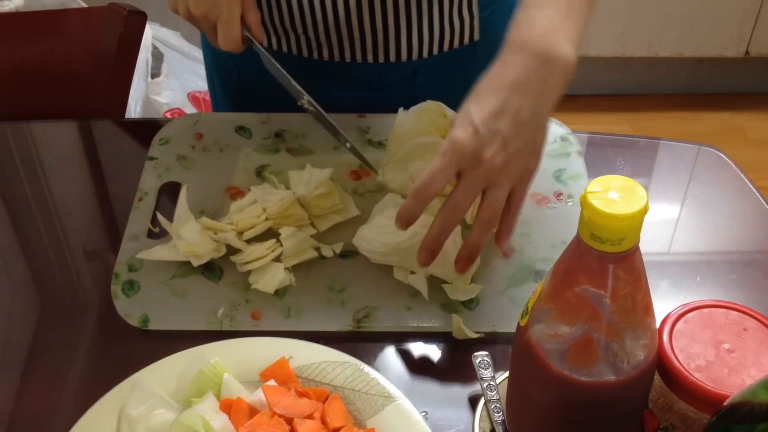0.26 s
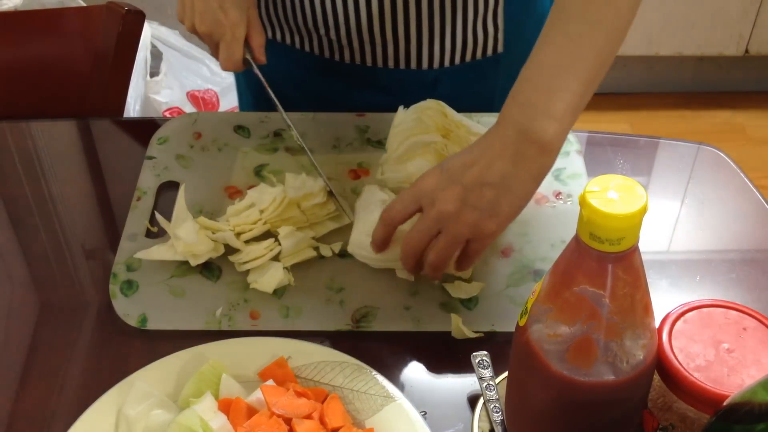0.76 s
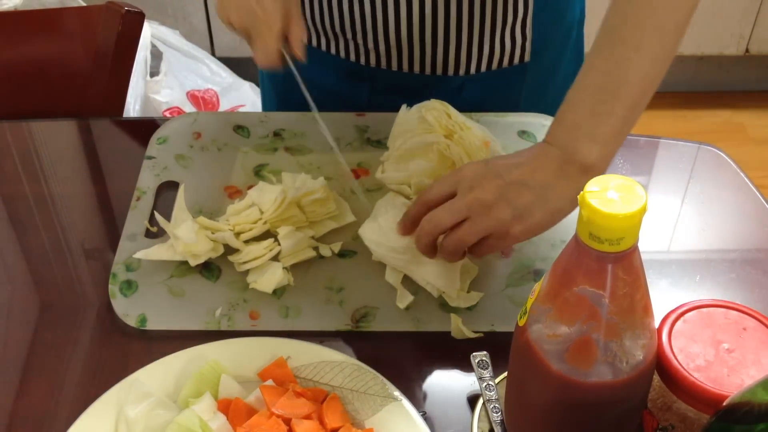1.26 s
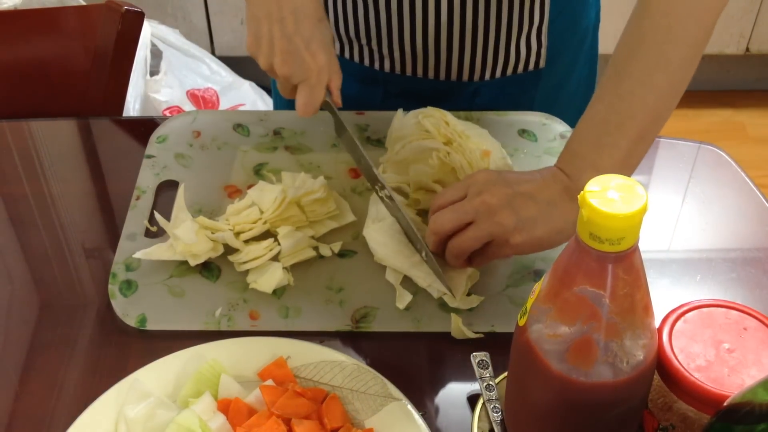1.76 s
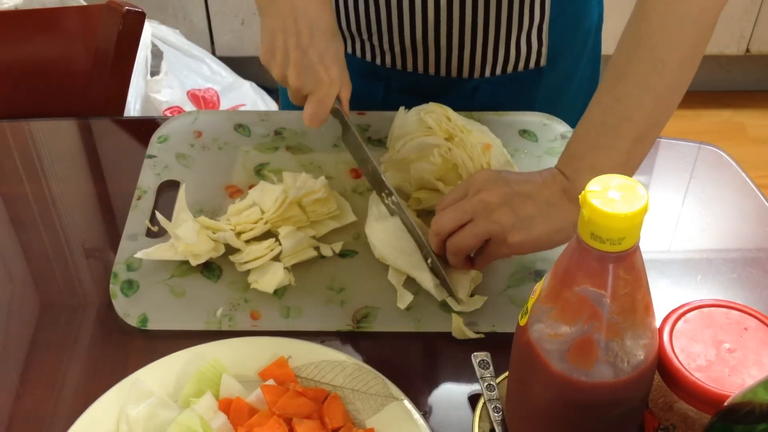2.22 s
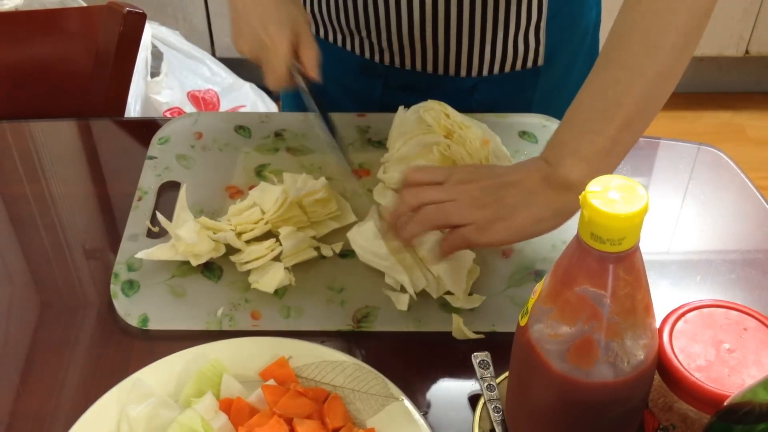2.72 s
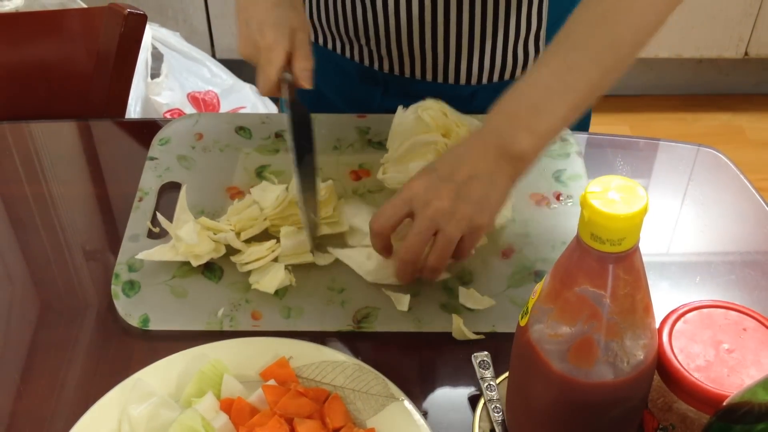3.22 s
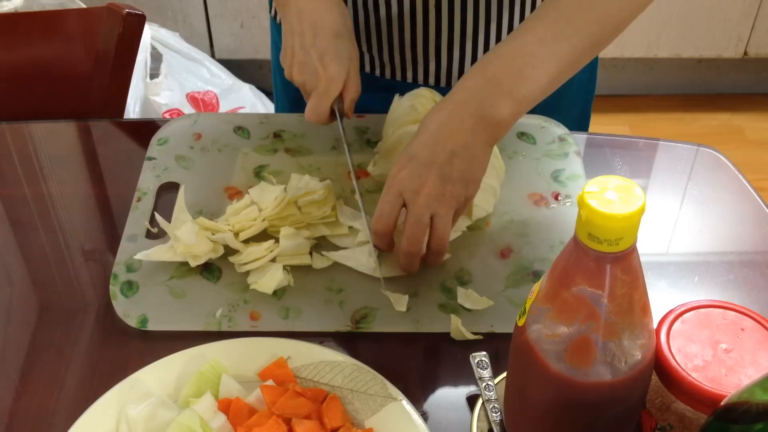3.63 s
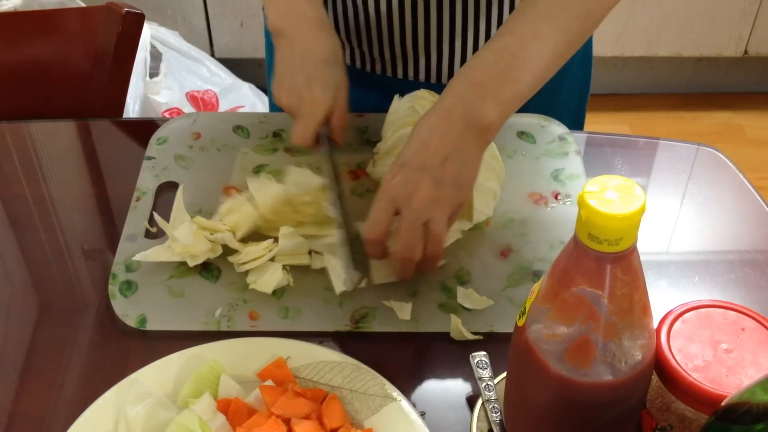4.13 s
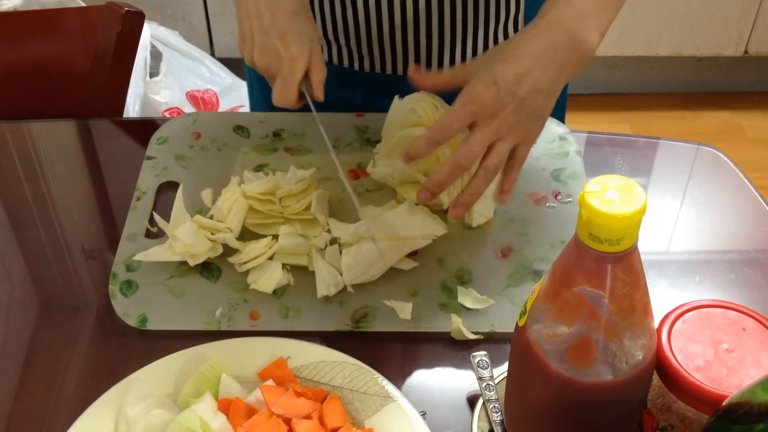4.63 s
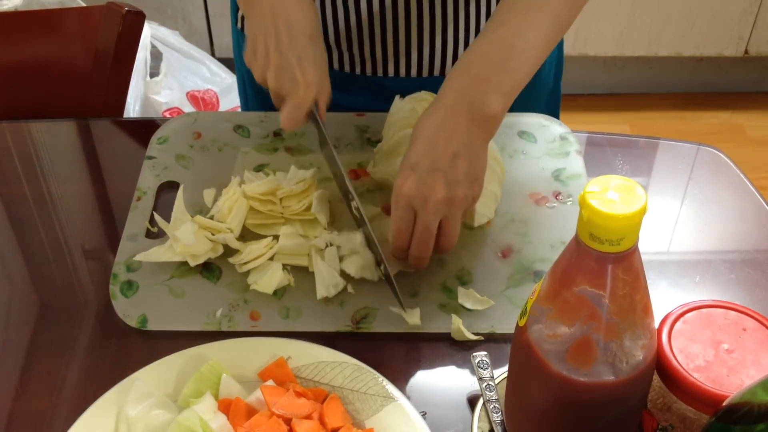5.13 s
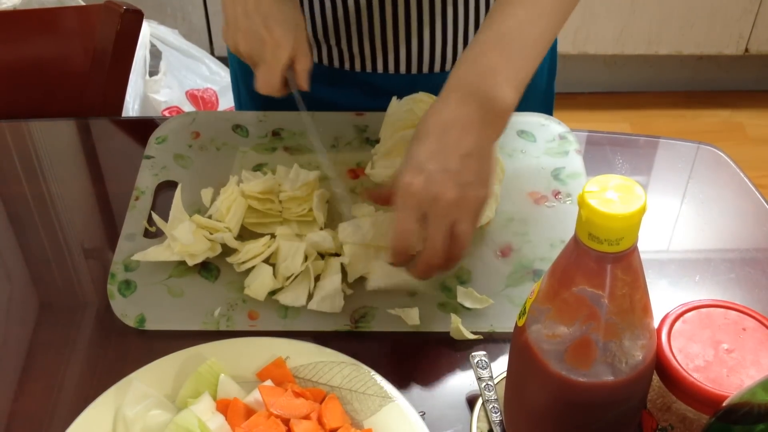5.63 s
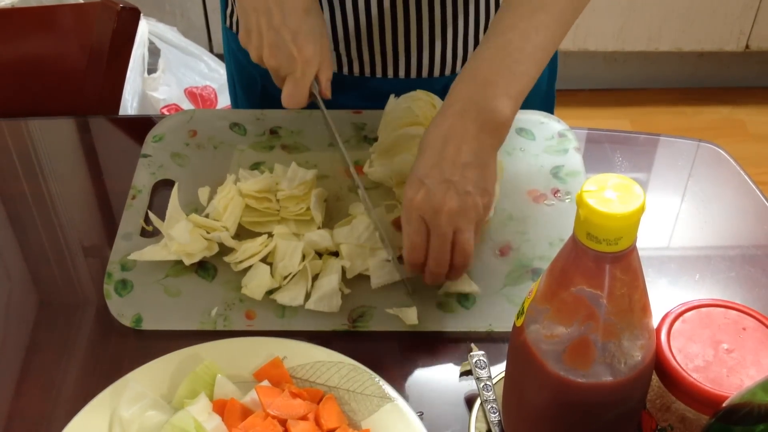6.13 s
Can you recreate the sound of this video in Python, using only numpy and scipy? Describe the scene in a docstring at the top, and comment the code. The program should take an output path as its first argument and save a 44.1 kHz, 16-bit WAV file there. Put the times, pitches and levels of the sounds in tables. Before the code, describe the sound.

A quiet kitchen with a soft, steady hum and slight short echo, heard close by a small microphone lacking deep bass. A faint leaf rustle fades at the start; from 0.5 to 1.4 seconds small crisp tears and snaps come scattered. At about 1.5 a long cut begins, crunching densely through raw cabbage, with many bright cracks around 1.7 to 2.1 and another crackling run from 2.3 to 2.55, ending in light hollow board knocks. It drops to rustles and small tears, with a light tap near 3.0. A short crisp cut at 3.7 to 4.0 lands two sharp knocks; a very faint steel tick follows at 4.2. After a lull, snaps resume at 4.9, with a crunch from 5.05 to 5.3. A small thin blade ring sounds near 5.45, then only soft leaf shuffling until the end at about 6.4.

```python
"""A kitchen knife slices raw cabbage on a thin cutting board lying on a table.
Tearing leaves are crackling noise that swells and fades; snapping ribs and veins are short cracks with a pitch.
The board rings when knocked and grates when rubbed; the steel blade rings when its edge touches down.
A quiet kitchen hums behind, as shaped noise, and answers with a short echo."""
import sys
import numpy as np
from scipy import signal
from scipy.fft import rfft, irfft, next_fast_len
from scipy.io import wavfile
from scipy.ndimage import uniform_filter1d

SR = 44100
rng = np.random.default_rng(int(sys.argv[2]) if len(sys.argv) > 2 else 0)


def persist_wave(psi):
    """Save psi, clipped to +-1, as 16-bit WAV."""
    counts = np.round(np.clip(psi, -1, 1) * 32767).astype(np.int16)
    wavfile.write(sys.argv[1], SR, np.atleast_2d(counts).T)


N = 280917  # length in samples

# ways the cutting board vibrates (its modes): pitch_hz, width_hz, level_db (relative)
BOARD_MODES = [(270, 110, -4), (510, 150, -3), (750, 200, -3), (980, 200, -4), (1170, 320, -2)]
# the blade or a rib strikes the board: start_s, level_db (before the bass cut), near_hz (mode nearest the blow)
BOARD_KNOCKS = [(0.034, -35, 600), (1.8305, -27, 1180), (1.9036, -32, 1170), (2.3387, -23, 1120),
                (2.5318, -20, 1180), (2.6768, -34, 760), (3.0263, -26, 1230), (3.7954, -18.5, 780),
                (3.9583, -21.5, 510), (5.0934, -32, 1240)]


def amp(db):
    """Turn decibels into a plain gain."""
    return 10 ** (np.asarray(db) / 20)


def unit(x):
    """Scale a signal to an average (RMS) level of 1."""
    return x / np.sqrt(np.mean(x ** 2) + 1e-20)


def along(points, hz):
    """Read a curve of (Hz, value) points, with straight lines on a log pitch axis."""
    f, v = np.transpose(points)
    return np.interp(np.log(hz + 1), np.log(f + 1), v)


def filtered(x, response):
    """Multiply the spectrum of x by a (possibly complex) response of frequency."""
    m = next_fast_len(N + SR // 2)  # spare room for ringing
    spectrum = rfft(x, m) * response(np.fft.rfftfreq(m, 1 / SR))
    return irfft(spectrum, m)[..., :N]


def modes(table):
    """Response of resonances (Hz, width Hz, dB) that ring only after they are driven."""
    def response(f):
        total = 0
        for k, (center, width, db) in enumerate(table):
            resonance = 1j * f * width / (center * center - f * f + 1j * f * width)
            total = total + (-1) ** k * amp(db) * resonance  # signs alternate
        return total
    return response


def swell(s, db, rise_ms, fall_ms):
    """Power that climbs to a peak and falls, evenly in dB (ms per 10 dB); gives the samples touched and power."""
    rise, fall = max(rise_ms, 2) / 1000, max(fall_ms, 4) / 1000
    first = max(round((s - 5 * rise) * SR), 0)  # the shape spans 50 dB on each side
    last = min(round((s + 5 * fall) * SR), N)
    span = slice(first, last)
    t = np.arange(first, last) / SR - s
    drop_db = 10 * np.where(t < 0, -t / rise, t / fall)
    return span, amp(db - drop_db) ** 2


def nearness(near_hz):
    """Gain of each board mode for a touch at a place: 14 dB weaker per octave away."""
    octaves = np.abs(np.log2(np.array(BOARD_MODES)[:, 0] / near_hz))
    return amp(-14 * octaves)


def hum():
    """The steady noise of the kitchen, with a few wavering tones made of narrow noise bands."""
    # colour of the hum: pitch_hz, level_db (relative, per Hz)
    hum_colour = [(25, -6), (110, -19), (155, -3.5), (350, -3.5), (520, -6.5), (850, -4), (1250, -8.5),
                  (1700, -15), (3800, -21), (6300, -18), (11600, -25.5), (15500, -22.5)]
    # fuzzy tones: pitch_hz, width_hz, level_db
    drones = [(251.5, 8.5, -69.5), (347.6, 24, -67.5), (811, 6.3, -69)]
    noise = filtered(rng.standard_normal(N), lambda hz: amp(along(hum_colour, hz)))
    sound = amp(-57) * unit(noise)
    for hz, width, db in drones:
        tone = filtered(rng.standard_normal(N), modes([(hz, width, 0)]))
        sound = sound + amp(db) * unit(tone)
    return sound


def kitchen(x):
    """The room's echo is a fading noise tail in which each frequency dies at its own speed."""
    # how long the echo takes to fade by 60 dB: pitch_hz, fade_s
    echo_fades = [(200, 0.32), (2000, 0.3), (10000, 0.2)]
    hz, t, z = signal.stft(rng.standard_normal(SR // 2), SR, nperseg=256)
    fade = amp(-60 * t / along(echo_fades, hz)[:, None])
    tail = signal.istft(z * fade, SR, nperseg=256)[1]
    late = np.pad(x, (200, 0))  # the echo starts 200 samples late
    return signal.fftconvolve(late, tail / np.linalg.norm(tail))[:N]


def blade():
    """The edge scrapes for a few milliseconds and sets the steel ringing; the place chooses the modes."""
    # the edge touches the board: start_s, level_db (relative), place (0 near the tip, 1 near the heel)
    touches = [(4.2, -29, 0), (5.454, -24.5, 0.98)]
    # ringing tones of the steel: pitch_hz, tip_db, heel_db (relative, struck there), fade_s (to fall 60 dB)
    blade_modes = [(3365, -13, -1.5, 0.092), (3940, -15, -8, 0.11), (4766, -24, 1.5, 0.065),
                   (4900, 1, -24, 0.1), (6100, -3, -13, 0.053), (6650, -20, -5, 0.078),
                   (7180, -2, -2, 0.079), (7650, -6, -2, .05), (8460, -19, 4, 0.06), (9800, -6, -10, 0.046),
                   (11200, -14, -13, 0.062)]
    steel, t = np.zeros(N + SR), np.arange(SR // 4) / SR
    onset = 1 - np.exp(-(t / 0.0046) ** 2)
    for s, db, place in touches:
        ring = np.zeros(len(t))
        for hz, tip_db, heel_db, fade_s in blade_modes:
            level_db = tip_db + place * (heel_db - tip_db) + rng.normal(0, 1.5)
            ring += amp(level_db - 60 * t / fade_s) * np.sin(2 * np.pi * (hz * t + rng.random()))
        start = round((s - 0.006) * SR)  # the soft onset begins a little early
        steel[start:][:len(t)] += amp(db - 3) * ring * onset
    return steel[:N]


def knocks():
    """A blow of about a millisecond rings every board mode, most the nearest; the thin board sends out little bass."""
    wood, t = np.zeros(N + SR), np.arange(SR // 10) / SR
    onset = 1 - np.exp(-t / 0.00067)
    for s, db, near_hz in BOARD_KNOCKS:
        ring = np.zeros(len(t))
        for gain, (hz, width, level_db) in zip(nearness(near_hz), BOARD_MODES):
            fade = np.exp(-np.pi * width * t)  # a wide mode dies fast
            ring += gain * amp(level_db) * fade * np.sin(2 * np.pi * hz * t)
        ring = ring * onset
        wood[round(s * SR):][:len(t)] += amp(db) * ring / np.abs(ring).max()
    bass_cut = signal.butter(2, 297, "highpass", fs=SR, output="sos")
    return signal.sosfilt(bass_cut, wood[:N])


def tearing():
    """Power of all tearing and rubbing leaves, as a sum of swells."""
    # a leaf rips open at once and the tear runs out: peak_s, level_db, fall_ms (per 10 dB)
    rips = [(0.005, -42.5, 73), (0.595, -47, 67.5), (0.794, -35, 27), (0.894, -35, 27), (1.124, -40.5, 36),
            (1.185, -48.5, 64), (1.241, -33.5, 30), (1.271, -37, 29.5), (1.395, -52.5, 139),
            (1.55, -31, 80.5), (1.667, -26.5, 25.5), (1.701, -30, 24), (1.73, -28.5, 16.5),
            (1.767, -30.5, 39), (1.836, -23.5, 47), (1.906, -34, 9), (1.953, -36, 18.5), (2.004, -29, 17.5),
            (2.133, -30, 17.5), (2.187, -30.5, 41), (2.228, -29, 6), (2.298, -38, 50.5), (2.342, -31, 27),
            (2.418, -32, 110), (2.675, -40, 47), (2.873, -46.5, 36.5), (3.005, -37.5, 6),
            (3.095, -45, 30.5), (3.316, -35.5, 12.5), (3.354, -40, 125.5), (3.746, -41, 47.5),
            (3.8, -35.5, 51), (4.069, -39.5, 9.5), (4.199, -40, 63.5), (4.906, -38, 18.5),
            (4.95, -47.5, 70.5), (5.096, -36, 17.5), (5.985, -46.5, 15.5), (6.36, -43, 45)]
    # the blade presses ever harder until the stack gives way: peak_s, level_db, rise_ms (per 10 dB)
    cuts = [(0.947, -35.5, 37), (2.067, -27.5, 56.5), (2.524, -29.5, 36.5), (3.057, -37.5, 27),
            (3.192, -49.5, 200.5), (3.291, -42, 101.5), (3.846, -36, 16.5), (3.95, -27.5, 21),
            (4.134, -50.5, 48), (5.188, -28, 50.5), (5.294, -32, 59.5)]
    # a hand shifts leaves, swelling and fading alike: peak_s, level_db, slope_ms (per 10 dB)
    rubs = [(0.535, -48, 20), (1.026, -40.5, 58.5), (2.779, -40.5, 23.5), (3.44, -43.5, 59),
            (3.578, -40.5, 19.5), (3.677, -40.5, 15), (3.716, -41.5, 10), (4.011, -38.5, 40.5),
            (4.309, -40, 49), (4.859, -39.5, 24), (5.369, -44, 35.5), (5.461, -37.5, 53.5),
            (5.56, -42.5, 55), (5.906, -42, 18.5), (6.06, -52, 79.5), (6.242, -43, 39)]
    rip_rise_ms, cut_fall_ms = 7, 22  # per 10 dB
    shapes = [(s, db, rip_rise_ms, ms) for s, db, ms in rips]
    shapes += [(s, db, ms, cut_fall_ms) for s, db, ms in cuts]
    shapes += [(s, db, ms, ms) for s, db, ms in rubs]
    power = np.zeros(N)
    for shape in shapes:
        span, tear = swell(*shape)
        power[span] += tear
    return power


def veins():
    """Thin veins snap by chance, more often and louder the harder the leaves tear; rows like the ribs'."""
    count = 60
    over_tearing_db, scatter_db = 5.5, 3.5
    middle_hz, spread_octaves = 5300, 0.394
    power, draw = tearing(), rng.random(count)
    spread = rng.standard_normal((count, 2))
    chance = np.cumsum(np.sqrt(power))
    at = np.searchsorted(chance, draw * chance[-1])
    db = 10 * np.log10(power[at]) + over_tearing_db + scatter_db * spread[:, 0]
    hz = middle_hz * 2 ** (spread_octaves * np.clip(spread[:, 1], -2, 2))
    return list(zip(at / SR, db, hz))


def snaps():
    """Each rib or vein cracks for milliseconds: its air pocket rings at two pitches, fibres tear after it."""
    # ribs that snap loudly: start_s, level_db (relative), pitch_hz
    ribs = [(0.5446, -33.5, 3800), (0.599, -27, 4070), (0.69, -43, 3300), (0.787, -27, 3600),
            (0.8632, -22, 5200), (0.8918, -28, 5100), (1.186, -33, 3480), (1.2375, -23.5, 3100),
            (1.276, -28, 4500),(1.3956, -35, 3000), (1.5096, -43, 3570), (1.5462, -23, 3100),
            (1.562, -21.5, 2980), (1.603, -23, 3040), (1.6639, -19.5, 6660), (1.6998, -17, 2800),
            (1.7272, -17.5, 7480), (1.7593, -25, 4030), (1.77, -17.5, 3060), (1.8252, -17, 3820),
            (1.8296, -15, 6370), (1.8483, -14, 2800), (1.8559, -16.5, 2300), (1.8691, -17, 2500),
            (1.876, -16.5, 5330), (1.9033, -15.5, 3840), (1.951, -22, 7000), (2.0004, -16.5, 5000),
            (2.024, -15.5, 5840), (2.044, -14, 6750), (2.052, -21, 3800), (2.1053, -18.5, 3870),
            (2.1297, -35, 7700), (2.228, -18, 5860), (2.295, -25.5, 5330), (2.3392, -13, 2990),
            (2.414, -20.5, 5940), (2.4334, -23, 5860), (2.4491, -20, 5600), (2.4652, -18.5, 5750),
            (2.4805, -14.5, 4500), (2.4948, -16, 3300), (2.5213, -16, 6720), (2.5312, -17.5, 2880),
            (3.0266, -28.5, 3580), (3.225, -29.5, 5900), (3.718, -30.5, 4870), (3.741, -25.5, 7530),
            (3.795, -16.5, 6670), (3.805, -24, 5460), (3.8272, -22, 5960), (3.846, -25.5, 9240),
            (3.9216, -17, 7650), (3.9278, -17, 5680), (3.9488, -22, 6000), (3.958, -15, 2320),
            (4.0107, -23, 5800), (4.1342, -31.5, 2960), (4.9024, -22, 6400), (4.9532, -25.5, 7390),
            (5.0365, -30, 3370), (5.0936, -14, 3620), (5.1268, -25, 3540), (5.1483, -20.5, 3500),
            (5.1688, -24, 3900), (5.177, -20, 7650), (5.184, -15.5, 3700), (5.1952, -14.5, 7400),
            (5.2925, -16.5, 7580), (5.2966, -20, 3900), (5.381, -34.5, 4830), (5.3938, -40, 4800),
            (5.405, -36, 4760), (5.5722, -38, 4800), (6.243, -33, 2970), (6.2562, -34, 3330)]
    cracks, t = np.zeros(N + SR), np.arange(SR // 20) / SR
    band = signal.butter(2, [1800, 11000], "bandpass", fs=SR)
    envelope = amp(-60 * t / 0.0086) * (1 - np.exp(-t / 0.0001))
    for s, db, hz in ribs + veins():
        noise = unit(signal.lfilter(*band, rng.standard_normal(len(t))))
        partner_hz = hz * 3.2 * rng.normal(1, 0.04)  # folds back down if above SR / 2
        pocket = np.sin(2 * np.pi * hz * t) + 0.5 * np.sin(2 * np.pi * partner_hz * t)
        crack = (pocket + 0.55 * noise) * envelope
        fibres = amp(-37.5 - 60 * t / 0.12) * noise
        crack = crack / np.abs(crack).max() + fibres
        cracks[round(s * SR):][:len(t)] += amp(db + 2.5) * crack
    return cracks[:N]


def crackle(density, spread_db, life, bed_db):
    """Breaking cells: noise bursts (density per s, life s to fade 60 dB) of random size, over a rubbing bed."""
    size_db = np.minimum(spread_db * rng.exponential(size=N), 12)
    breaks = (rng.random(N) < density / SR) * amp(size_db)
    fade = amp(-60 * np.arange(SR // 20) / SR / life)
    bursts = unit(signal.fftconvolve(breaks, fade)[:N])
    return (bursts + amp(bed_db)) * rng.standard_normal(N)


def patchy(x, depth_db):
    """Folds of leaf open and close pockets of air: random colour in patches of some hundred Hz by some ten ms."""
    z = signal.stft(x, nperseg=256)[2]
    field = uniform_filter1d(rng.standard_normal(z.shape), size=4, axis=0)  # smooth over pitch
    field = uniform_filter1d(field, size=12, axis=1)  # smooth over time
    return signal.istft(z * amp(depth_db * unit(field)), nperseg=256)[1][:N]


def leaves():
    """Each tear swells and fades; thin leaves hiss bright, thick ones crunch low; the board takes the drag."""
    # colour of the leaves: pitch_hz, level_db (relative, per Hz)
    leaf_colour = [(880, -15), (1500, -14), (1750, -10.5), (2150, -3), (2340, -2), (3770, -2), (6790, -0.5),
                   (12900, -12.5), (14500, -31)]
    # share of treble in the tearing, low where leaves are thick: time_s, share_db (before the limits below)
    brightness = [(0, 2), (.3, 4), (.55, -3), (1, -2), (1.2, -6), (1.5, -0.5), (1.7, -5.5), (2.1, -3.5),
                  (2.6, -3), (3.2, -0.5), (3.45, -3.5), (3.6, -1.37), (5.3, -1), (5.45, -2.5), (6.37, -3)]
    # leaves drag and press on the board: peak_s, level_db (relative), near_hz (mode nearest the place)
    drags = [(2.05, -48, 1000), (2.36, -39, 270), (2.44, -40, 270), (2.51, -41, 990), (3.975, -43, 520),
             (4.119, -49, 750), (4.198, -47, 830), (5.16, -41, 448), (5.28, -42, 1070), (5.45, -44, 810)]
    drag_rise_ms, drag_fall_ms = 17, 32  # per 10 dB
    rattle_db, rattle_fall_ms = -19.5, 37  # relative to the knock; per 10 dB
    cut_hz = 1480  # board pitch for the place where the leaves are cut

    power = tearing()
    share_db = np.interp(np.arange(N) / SR, *np.transpose(brightness))
    treble = power * np.clip(amp(share_db) ** 2, 0.05, 0.95)

    rubs = [(s, db, drag_rise_ms, drag_fall_ms, hz) for s, db, hz in drags]
    # after a knock the board rattles on the table
    rubs += [(s, db + rattle_db, 0, rattle_fall_ms, hz) for s, db, hz in BOARD_KNOCKS]
    drag = np.zeros((len(BOARD_MODES), N))  # power in each board mode
    for s, db, rise_ms, fall_ms, near_hz in rubs:
        span, rub = swell(s, db, rise_ms, fall_ms)
        drag[:, span] += rub * nearness(near_hz)[:, None] ** 2

    cells = crackle(density=300, spread_db=1.5, life=0.013, bed_db=-1.0)
    grit = crackle(density=260, spread_db=-1.0, life=0.015, bed_db=2.5)

    # the sound through the air, split near 5 kHz
    sound = patchy(filtered(cells, lambda hz: amp(along(leaf_colour, hz))), depth_db=2.5)
    low = filtered(sound, lambda hz: 1 / (1 + (hz / 5000) ** 6))
    air = np.sqrt(treble) * unit(sound - low) + np.sqrt(power - treble) * unit(low)

    # the sound through the board: grit rings each mode, driven by drags and by the tearing itself
    wood = []
    for hz, width, db in BOARD_MODES:
        wood.append(amp(db) * unit(filtered(grit, modes([(hz, width, 0)]))))
    wood = filtered(np.array(wood), lambda hz: 1 / (1 + (140 / (hz + 1)) ** 4 + (hz / 1800) ** 4))
    cut_gain = amp(-15.5) * nearness(cut_hz)[:, None] ** 0.5
    drive = np.sqrt(drag + cut_gain ** 2 * power)
    return amp(-2.0) * air + np.sum(drive * wood, axis=0)


def scene():
    """The sounds at the board, their echo and the hum together."""
    near = leaves() + snaps() + knocks() + blade()
    return (near + amp(-13.5) * kitchen(near) + hum())[None]


def record(dry):
    """The small microphone drops the deep bass and the last treble; nothing is kept from 15700 Hz up."""
    bass_cut = signal.butter(4, 125, "highpass", fs=SR, output="sos")
    thin = signal.sosfilt(bass_cut, dry)
    return filtered(thin, lambda hz: (hz < 15700) / (1 + (hz / 14800) ** 30))


dry = scene()
out = record(dry)
persist_wave(out)
```